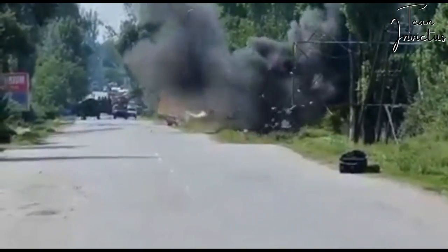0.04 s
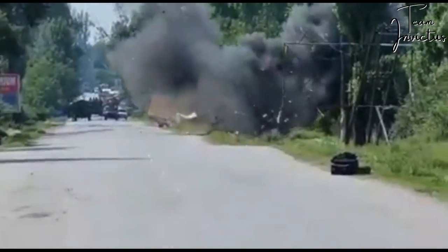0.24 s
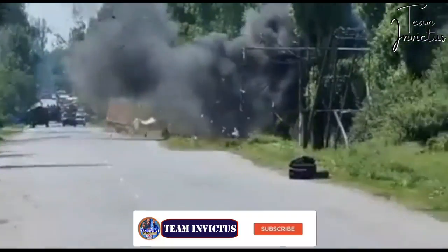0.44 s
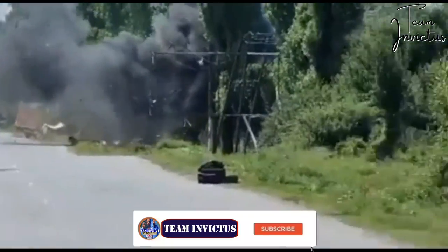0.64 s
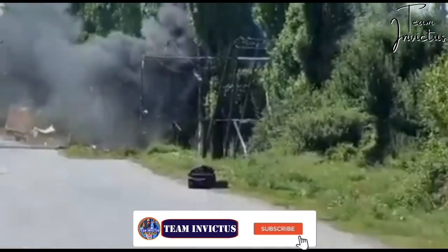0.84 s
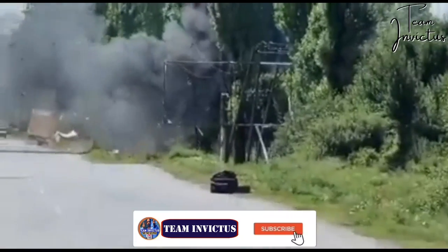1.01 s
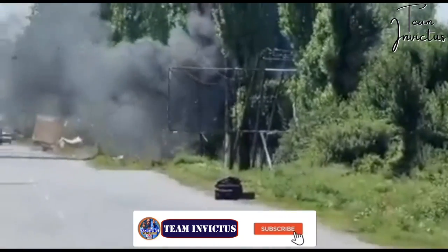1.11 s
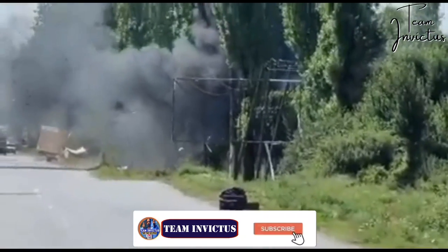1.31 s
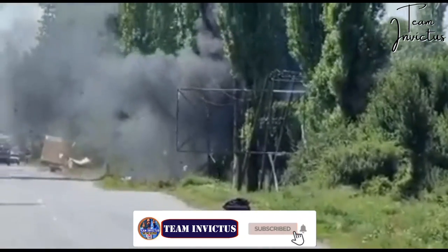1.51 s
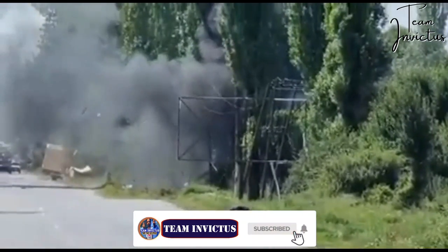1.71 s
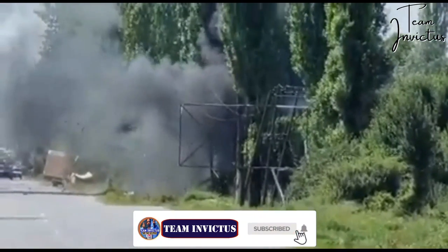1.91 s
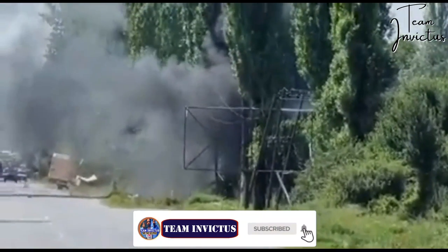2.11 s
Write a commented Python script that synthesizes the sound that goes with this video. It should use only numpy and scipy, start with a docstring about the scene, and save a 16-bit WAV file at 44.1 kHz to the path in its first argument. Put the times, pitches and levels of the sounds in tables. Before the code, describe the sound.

After a brief moment of low air, a massive explosion cracks in quick overlapping bursts, overloading the microphone; a deep surging rumble rolls back from roadside trees while debris lands in scattered thuds and knocks.

```python
"""Far down a road between tree lines, a charge goes off: a few overlapping noise-burst cracks over
a low bed of air, then a roar of noise whose bands die at their own speeds, the bass lasting longest.
A deep rumble of low noise, with single surges and a dull echo wash, rolls back from the trees.
Thrown debris lands in resonant thuds and short sine knocks; light bright rustles stir close by."""
import sys
import numpy as np
from scipy import signal
from scipy.fft import rfft, irfft
from scipy.io import wavfile
from scipy.ndimage import uniform_filter1d

SR = 44100
rng = np.random.default_rng(int(sys.argv[2]) if len(sys.argv) > 2 else 0)


def bounce(signal):
    """Save signal as a 16-bit WAV file at the path given by the first command-line argument."""
    frames = np.transpose(np.atleast_2d(signal))
    limited = np.clip(frames, -1, 1)
    pcm = np.round(limited * 32767).astype(np.int16)
    wavfile.write(sys.argv[1], SR, pcm)


N = 94815

# How alike both channels are for diffuse air: frequency_hz, likeness (-1 to 1)
AIR_LIKENESS = [(300, -0.078), (8000, -0.028)]
# How alike both channels are for the blast: frequency_hz, likeness (-1 to 1)
NEAR_LIKENESS = [(60, 1), (500, 0.83), (1640, 0.52), (4940, 0.18), (14900, 0.47)]
# Lead of the left channel for the blast: frequency_hz, lead_radians
NEAR_LEAD = [(2500, 0.12), (4500, 1.3), (8000, 1.6)]
# Left over right balance for the blast: frequency_hz, balance_db
NEAR_BALANCE = [(2000, 0.5), (5000, -4), (13000, -1)]
# How alike both channels are for echoes and rustles: frequency_hz, likeness (-1 to 1)
FAR_LIKENESS = [(60, 0.43), (180, 1), (540, 0.65), (1640, 0.27), (4940, 0.33), (14900, 0.25)]


def amp(db):
    """Decibels to a linear factor."""
    return 10 ** (np.asarray(db) / 20)


def evened(x):
    """Scales to an RMS of one."""
    return x / np.sqrt(np.mean(x ** 2) + 1e-20)


def read(points, hz):
    """Reads a frequency table between its points, on a logarithmic frequency axis."""
    f, value = np.transpose(points)
    return np.interp(np.log(hz + 1), np.log(f + 1), value)


def curve(points):
    """A level over the whole scene, drawn in straight dB lines; near silence before its first point."""
    s, db = np.transpose(points)
    return amp(np.interp(np.arange(N) / SR, s, db, left=-120))


def burst(t, rise, hold, fall):
    """Rise, hold, then an exponential fall; hold counts from the onset, all in seconds."""
    return np.clip(t / rise, 0, 1) * np.exp(-np.maximum(t - hold, 0) / fall)


def grain(depth_db, count):
    """A level that flutters within a few milliseconds."""
    flutter = evened(uniform_filter1d(rng.standard_normal(count), size=80))
    return evened(amp(depth_db * flutter))


def noise(spectrum, same, phase=((1, 0), (2, 0)), pan=((1, 0), (2, 0))):
    """Two partly alike channels of coloured noise, with phase and level offsets between them."""
    hz = np.fft.rfftfreq(N, 1 / SR)
    a, b = rfft(rng.standard_normal((2, N)), axis=1)
    likeness = np.clip(read(same, hz), -1, 1)
    # half of each offset goes to either side
    turn = amp(read(pan, hz) / 2) * np.exp(.5j * read(phase, hz))
    left = a * turn
    right = (likeness * a + np.sqrt(1 - likeness ** 2) * b) / turn
    return evened(irfft(np.array([left, right]) * amp(read(spectrum, hz)), N, axis=1))


def undying(hz):
    """An endless decay time for every band."""
    return hz + np.inf


def shaped(x, t60, start, patchy_db, flicker_db):
    """Lets each band die at its own speed, in drifting patches, with flicker across all bands."""
    hz, t, z = signal.stft(x, SR, nperseg=256, noverlap=192)
    patches = uniform_filter1d(rng.standard_normal(z.shape[1:]), size=3, axis=0)
    patches = evened(uniform_filter1d(patches, size=30, axis=1))
    flicker = evened(uniform_filter1d(rng.standard_normal(len(t)), size=8))
    decay_db = -60 * np.maximum(t - start, 0) / t60(hz)[:, None]
    db = patchy_db * patches + flicker_db * flicker + decay_db
    return signal.istft(z * amp(db), SR, nperseg=256, noverlap=192)[1][:, :N]


def air():
    """A low, wide bed of patchy noise that sinks away after the blast arrives."""
    # Level of the bed: time_s, level_db
    air_level = [(0, -47), (.05, -46.5), (.08, -53.5), (.14, -45), (2.15, -74.5)]
    # Colour of the bed: frequency_hz, relative_db (per Hz)
    air_colour = [(15, -24), (65, 11.5), (150, 1), (250, -4), (3300, -9.5), (4900, -8.5), (8000, -19),
                  (15300, -36.5)]
    bed = shaped(noise(air_colour, AIR_LIKENESS), undying, 0, patchy_db=4.5, flicker_db=0.7)
    return curve(air_level) * bed


def rumble():
    """The deep rolling body with a boom, its own short swells held in, and one slow pressure push."""
    # Colour of the rolling noise: frequency_hz, relative_db (per Hz)
    rumble_colour = [(8.8, -43.5), (15, -6.5), (76, 2), (97, -4.5), (124, -6.5), (250, -25), (480, -120)]
    # Level of the rolling body: time_s, level_db
    rumble_level = [(.125, -62), (.165, -10.5), (.2, -24), (.27, -14.5), (.54, -15.5), (.9, -17.5),
                    (1.02, -25.5), (1.3, -21), (1.47, -26.5), (1.59, -22.5), (1.66, -31.5), (1.8, -25.5),
                    (1.87, -20.5), (2, -29), (2.045, -40.5), (2.09, -25), (2.15, -27)]
    boom_hz, boom_sag_hz_per_s, boom_width_hz, boom_db = 88.6, 7.4, 16, 9
    swell_held = .8  # share of the swell, in dB, that is levelled out
    side_share = 0.051  # sent to left and right in opposite sign
    push_s, push_length_s, push_hz, push_db = .188, .065, 36, -9
    t = np.arange(N) / SR
    x = noise(rumble_colour, AIR_LIKENESS)
    # shift the boom to zero frequency, smooth there, and shift back: a sagging resonance
    turn = np.exp(2j * np.pi * (boom_hz - boom_sag_hz_per_s * t / 2) * t)
    r = np.exp(-np.pi * boom_width_hz / SR)
    boom = 2 * (turn * signal.lfilter([1 - r], [1, -r], x / turn, axis=1)).real
    middle, side = x + amp(boom_db) * boom
    swell = np.sqrt(abs(uniform_filter1d(middle ** 2, size=2200)) + 0.0073)
    body = evened(middle / swell ** swell_held) + side_share * np.array([side, -side])
    u = np.clip((t - push_s) / push_length_s, 0, 1)
    push = amp(push_db) * np.sin(np.pi * u) * np.sin(2 * np.pi * push_hz * (t - push_s))
    return curve(rumble_level) * body + push


def cracks():
    """The blast front and its first strong reflections: short grainy bursts, each dulled by its own loss."""
    # Arrivals: start_s, level_db (before the treble loss), hold_s, treble_loss_db (at 10 kHz)
    arrivals = [(0.138, -35, 0.0098, 12), (.148, -23.5, 0.026, 2.5), (0.16, -13.5, 0.013, 4.5),
                (0.192, -9, 0.0078, 1.5), (0.215, -16.5, 0.028, 11.5), (0.245, -14.5, 0.025, 5),
                (0.269, -25.5, 0.069, 10)]
    # Colour ahead of the treble loss: frequency_hz, relative_db (per Hz)
    crack_colour = [(59, -5), (140, -19), (200, -3.5), (539, -14), (1540, -18), (2030, -23.5), (2160, -43),
                    (2730, -17), (3500, -19), (4100, -37.5), (4750, -11.5), (5400, -31.5), (6100, -18),
                    (8500, -38.5), (13200, -24), (15300, -48.5)]
    rise_s, fall_s, treble_loss_hz = 0.0038, 0.009, 10000
    t, hz = np.arange(N) / SR, np.fft.rfftfreq(N, 1 / SR)
    z = rfft(noise(crack_colour, NEAR_LIKENESS, NEAR_LEAD, NEAR_BALANCE), axis=1)
    out = np.zeros((2, N))
    for s, db, hold, loss_db in arrivals:
        dulled = irfft(z * amp(-loss_db * hz / treble_loss_hz), N, axis=1)
        out += amp(db) * burst(t - s, rise_s, hold, fall_s) * dulled
    return grain(4, count=N) * out


def opposed(x):
    """The first arrival reaches the two microphone ports out of phase in the bass."""
    until_s, fade_s, bass_hz, strength = .19, .012, 400, 2.2
    low = signal.sosfiltfilt(signal.butter(2, bass_hz, fs=SR, output="sos"), x.mean(0))
    steps = np.clip((np.arange(N) / SR - until_s) / fade_s, -50, 50)
    share = strength / (1 + np.exp(steps))  # halved at until_s
    side = share * signal.hilbert(low).imag  # bass turned a quarter cycle
    return x + np.array([side, -side])


def echoes():
    """Dull wash scattered back from far off: patchy noise under a falling level."""
    # Level of the wash: time_s, level_db
    echo_level = [(.15, -65), (.4, -25.5), (.9, -32.5), (1.2, -34), (1.5, -36.5), (2.15, -41)]
    # Colour of the wash: frequency_hz, relative_db (per Hz)
    echo_colour = [(71, -43.5), (120, -3), (216, -12), (2960, -29.5), (6400, -45), (8170, -61.5),
                   (15300, -82.5)]
    wash = shaped(noise(echo_colour, FAR_LIKENESS), undying, 0, patchy_db=3.5, flicker_db=0.0)
    return curve(echo_level) * wash


def roar():
    """Dense reflections from the roadside: noise whose bands die at their own speeds."""
    # Colour before the decay: frequency_hz, relative_db (per Hz)
    roar_colour = [(71, -30.5), (150, -5.5), (352, -20.5), (572, -16), (2140, -21.5), (3480, -20),
                   (3860, -28.5), (4920, -23.5), (8170, -35), (12300, -41), (13600, -45.5), (14000, -90)]
    # Time for each band to fall by 60 dB: frequency_hz, t60_s
    roar_t60 = [(300, 2.43), (1000, 0.77), (2500, 1.14), (5000, 1.24), (9000, 0.62), (14000, 1.07)]
    start_s, rise_s, level_db = 0.17, 0.048, -15.5
    x = noise(roar_colour, NEAR_LIKENESS, NEAR_LEAD, NEAR_BALANCE)
    x = shaped(x, lambda hz: read(roar_t60, hz), start_s + rise_s, patchy_db=1.77, flicker_db=0.6)
    return amp(level_db) * np.clip((np.arange(N) / SR - start_s) / rise_s, 0, 1) * x


def surges():
    """Deep, slightly steepened cycles that swell and fade, each thrown back by one obstacle."""
    # Single surges: centre_s, peak_db, pitch_hz
    returns = [(.268, -6.5, 109), (.33, -10, 71), (.4, -7, 65), (0.456, -16, 92), (0.517, -19, 88),
               (0.578, -10, 80), (.64, -13.5, 90.5), (0.721, -14.5, 65), (.77, -10, 95.7), (0.849, -10, 69),
               (0.926, -15, 101.5)]
    spread_s = 0.013  # standard deviation of the bell-shaped swell
    steepness = 0.25  # phase bend within each cycle, radians
    t, out = np.arange(N) / SR, np.zeros(N)
    for s, db, hz in returns:
        turn = 2 * np.pi * (hz * (t - s) + rng.random())
        swell = amp(db) * np.exp(-.5 * ((t - s) / spread_s) ** 2)
        out += swell * np.sin(turn + steepness * np.sin(turn))
    return out


def debris():
    """Each landing is a noisy burst through one broad resonance; heavier pieces knock or ring briefly."""
    # Scattered landings: start_s, level_db (before the envelope), centre_hz, width_hz, hold_s
    landings = [(0.508, -28.5, 370, 850, 0.074), (0.578, -31, 2700, 3420, 0.039),
                (0.874, -33.5, 1470, 3860, 0.036), (1.149, -42, 1550, 2930, 0.1),
                (1.28, -31, 900, 2030, 0.017), (1.303, -34, 900, 2600, 0.035),
                (1.399, -34, 800, 2540, 0.022), (1.601, -36.5, 1100, 1850, 0.013),
                (1.619, -31.5, 280, 393, 0.012), (1.73, -38.5, 1310, 1980, 0.03),
                (1.754, -35, 1110, 2240, 0.041), (1.804, -30, 700, 1500, 0.014),
                (1.823, -36, 900, 2030, 0.04), (1.866, -40.5, 1210, 2870, 0.027),
                (2.004, -39, 600, 2500, 0.051)]
    # Heavier pieces: start_s, peak_db, pitch_hz, length_s
    hard_knocks = [(1.237, -30.5, 777, 0.024), (1.26, -33.5, 760, 0.031), (1.285, -19.5, 800, 0.0052),
                   (1.286, -28.5, 480, 0.0084), (1.407, -26, 380, 0.016), (1.605, -33.5, 1350, 0.0043),
                   (1.637, -19, 273, .004), (1.661, -29.5, 335, .012), (1.755, -26, 297, 0.0051),
                   (1.824, -21.5, 286, 0.0064), (1.8024, -21.5, 865, 0.0053), (1.805, -18, 329, 0.0041),
                   (1.91, -30, 304, 0.01)]
    rise_s, fall_share, likeness = 0.0049, 0.28, 0.71  # fall as a share of the hold
    dull_hz, thin_hz = 5330, 150  # treble and bass are weakened beyond these
    count = 8192  # samples for one piece
    out, t = np.zeros((2, N + count)), np.arange(count) / SR
    hz = np.fft.rfftfreq(count, 1 / SR)
    for s, db, centre_hz, width_hz, hold in landings:
        a, b = rng.standard_normal((2, count))
        pair = np.array([a, likeness * a + np.sqrt(1 - likeness ** 2) * b])
        resonance = 1 / (1 + ((hz - centre_hz) / (width_hz / 2)) ** 2)
        colour = resonance * hz / (hz + thin_hz) / (1 + (hz / dull_hz) ** 8)
        pair = evened(irfft(rfft(pair * grain(1, count), axis=1) * colour, axis=1))
        at = round(s * SR)
        out[:, at:at + count] += amp(db) * pair * burst(t, rise_s, hold, fall_share * hold)
    for s, db, knock_hz, length in hard_knocks:
        at = round(s * SR)
        arch = np.sin(np.pi * np.minimum(t / length, 1) ** 0.75)  # leans towards the onset
        out[:, at:at + count] -= amp(db) * arch * np.sin(2 * np.pi * knock_hz * t)
    return out[:, :N]


def rustles():
    """Something light stirs near the microphone: short bursts of bright noise."""
    # Close stirs: start_s, level_db, hold_s
    stirs = [(2.008, -41.5, 0.0048), (2.018, -48, 0.028), (2.058, -52, 0.077), (2.135, -40, .03)]
    # Colour of the stirs: frequency_hz, relative_db (per Hz)
    rustle_colour = [(590, -29), (1000, -14.5), (6010, -19.5), (12100, -40), (15300, -48)]
    t = np.arange(N) / SR
    level = sum(amp(db) * burst(t - s, 0.0063, hold, 0.0055) for s, db, hold in stirs)
    return level * noise(rustle_colour, FAR_LIKENESS)


def scene():
    """The bed of air, the blast, what rolls back, and what lands."""
    blast = opposed(cracks() + rumble())
    rolling_back = echoes() + roar() + surges()
    return air() + blast + rolling_back + debris() + rustles()


def record(dry):
    """Overload on the peaks, then the band limit."""
    edge_hz = 15450
    band_limit = signal.firwin(511, edge_hz, window=("kaiser", 9), fs=SR)
    return signal.oaconvolve(np.clip(dry, -1, 1), band_limit[None], "same")


dry = scene()
out = record(dry)
bounce(out)
```